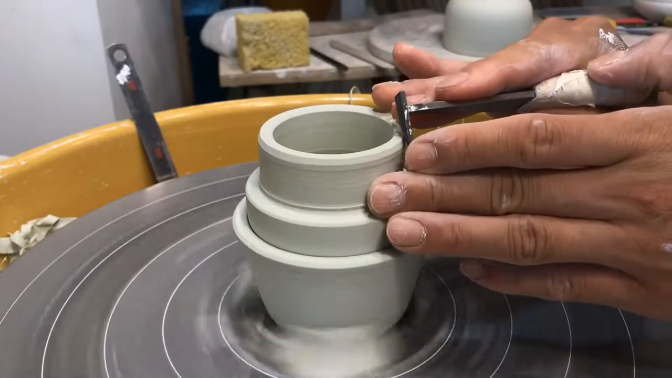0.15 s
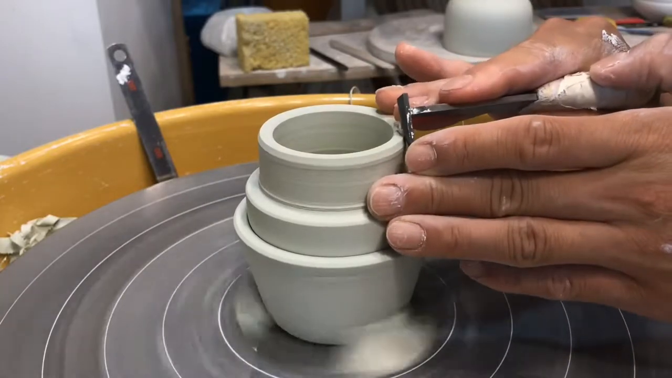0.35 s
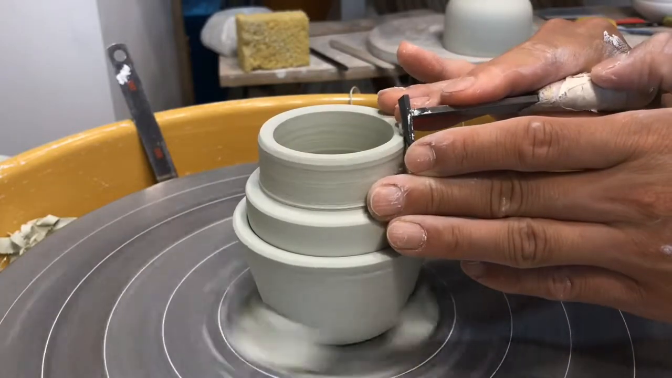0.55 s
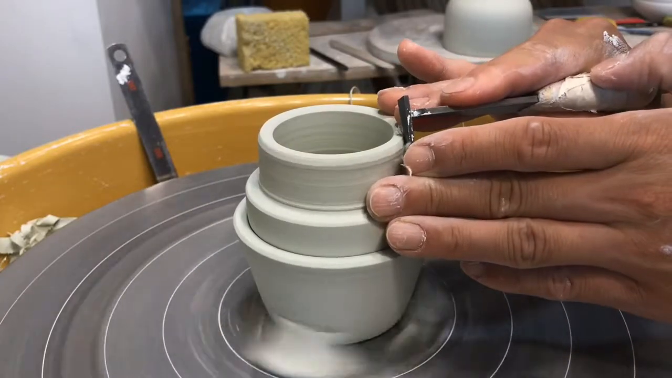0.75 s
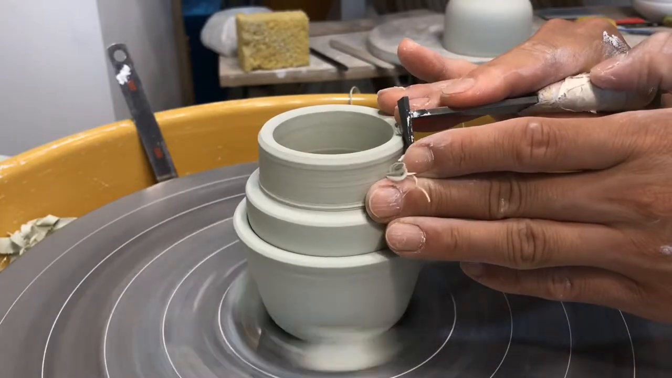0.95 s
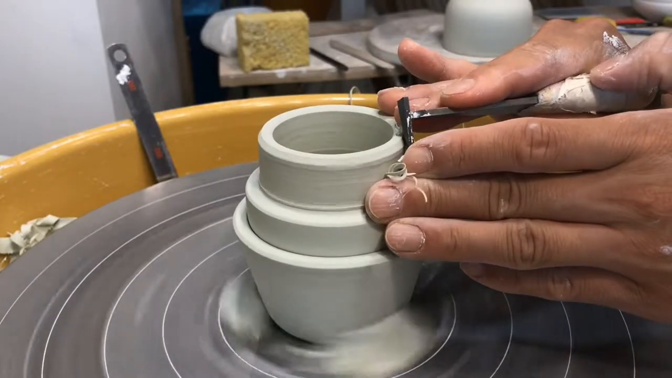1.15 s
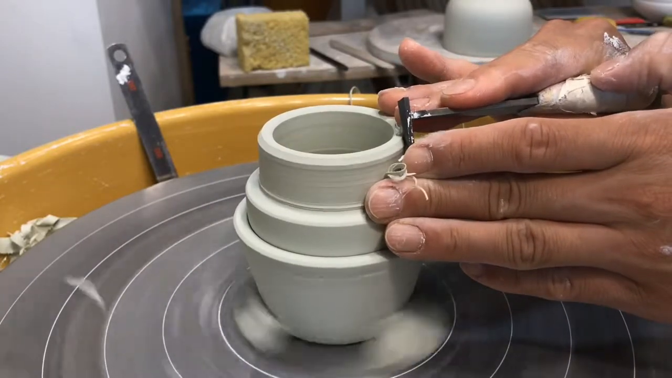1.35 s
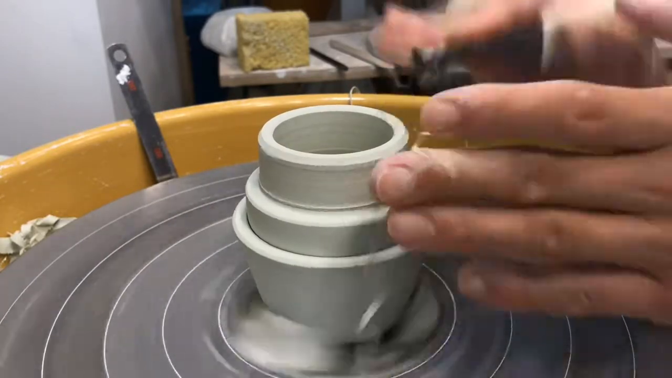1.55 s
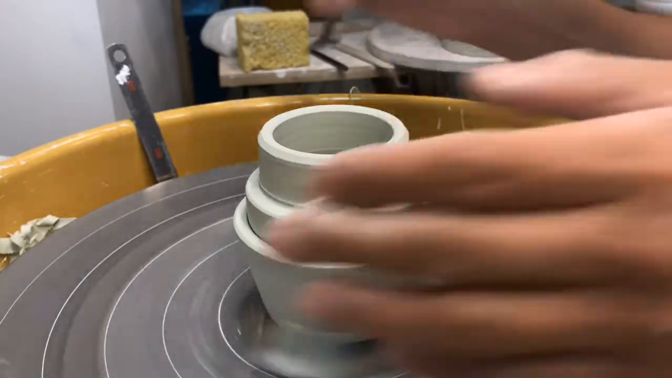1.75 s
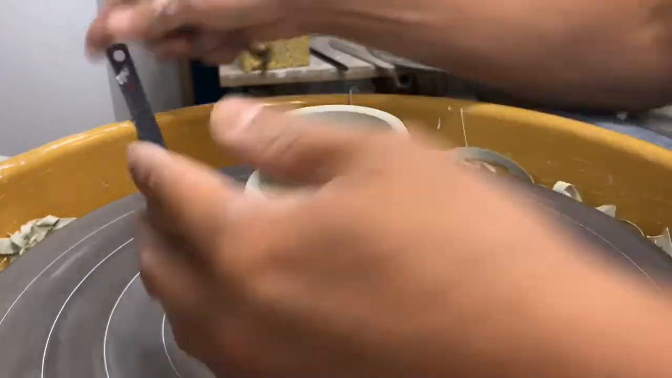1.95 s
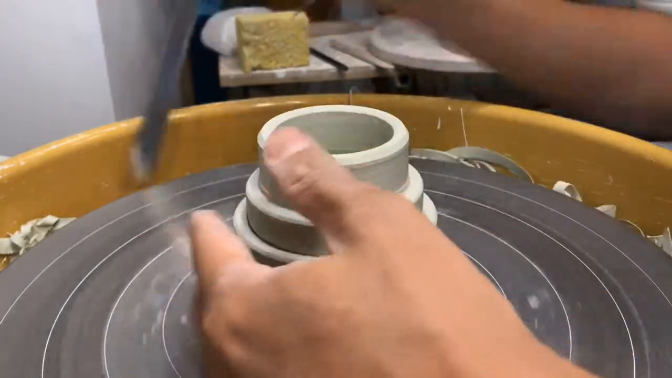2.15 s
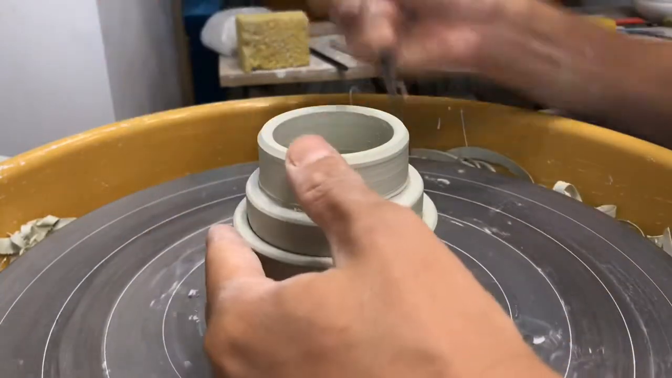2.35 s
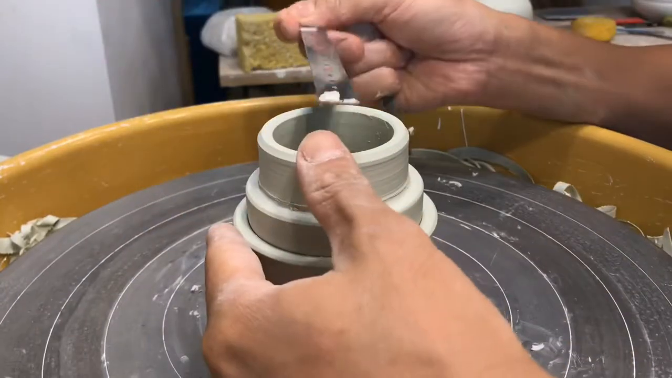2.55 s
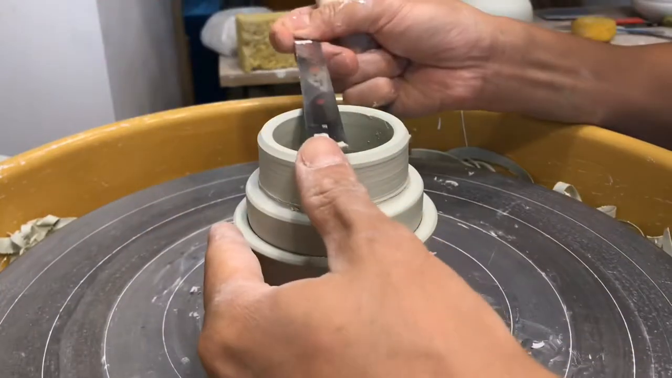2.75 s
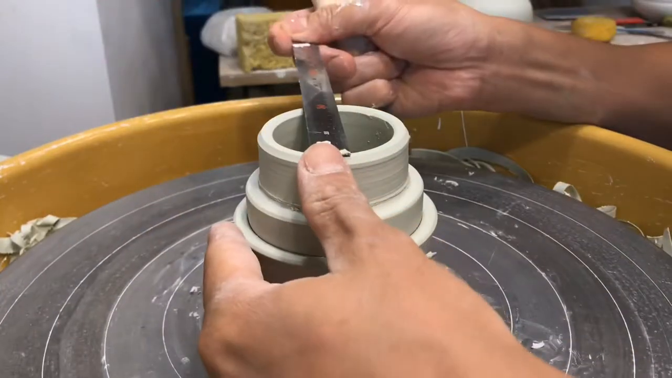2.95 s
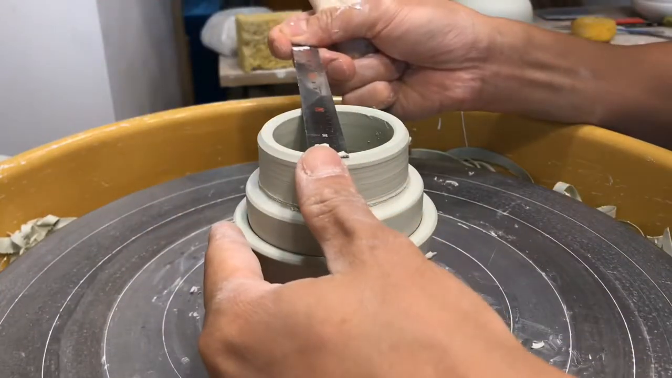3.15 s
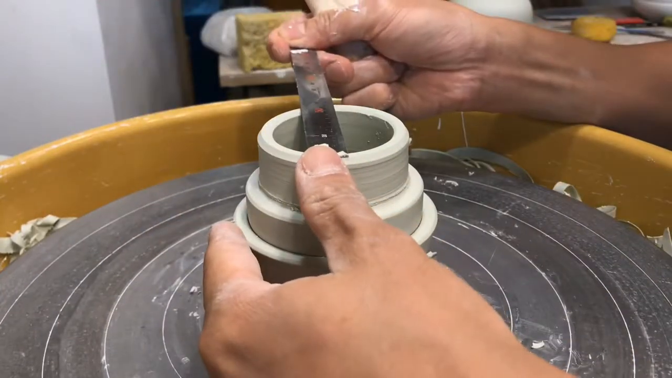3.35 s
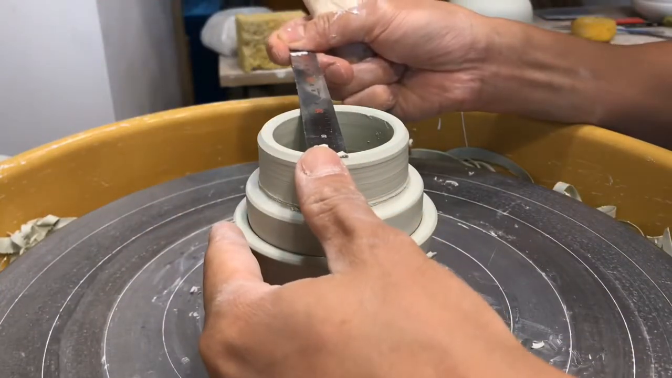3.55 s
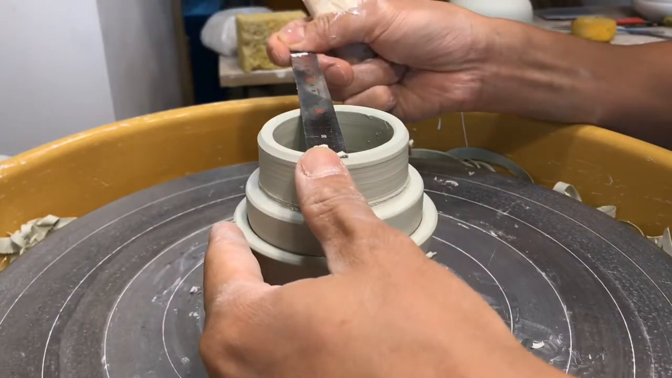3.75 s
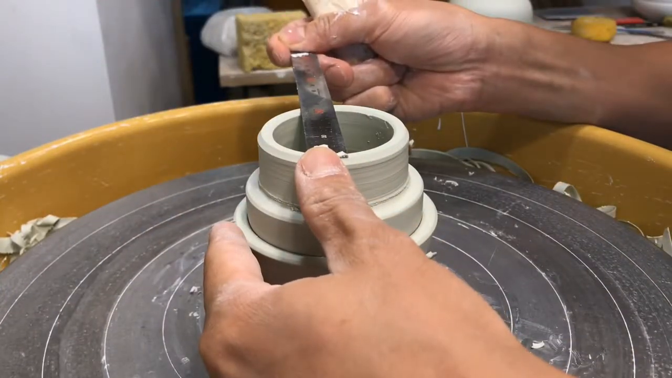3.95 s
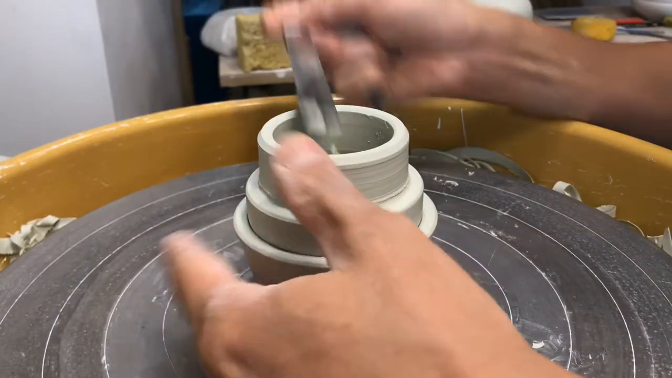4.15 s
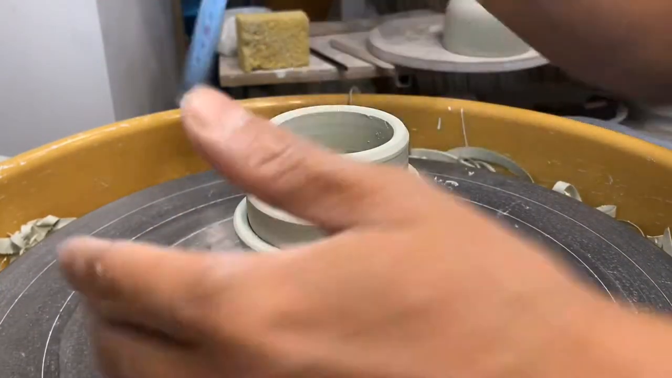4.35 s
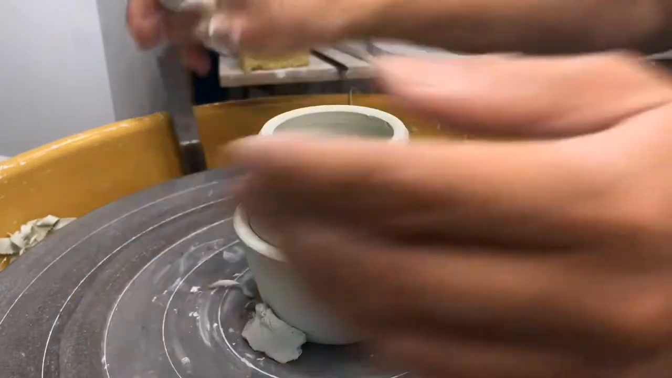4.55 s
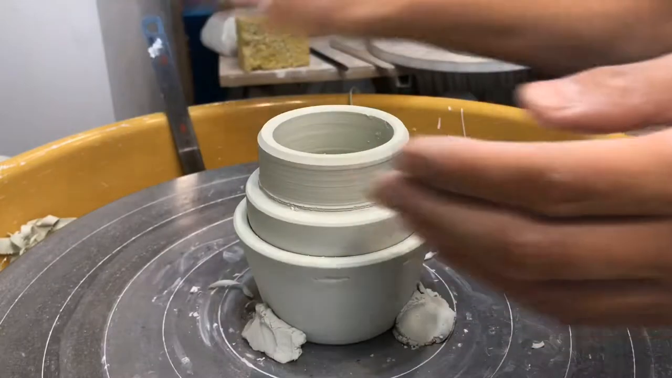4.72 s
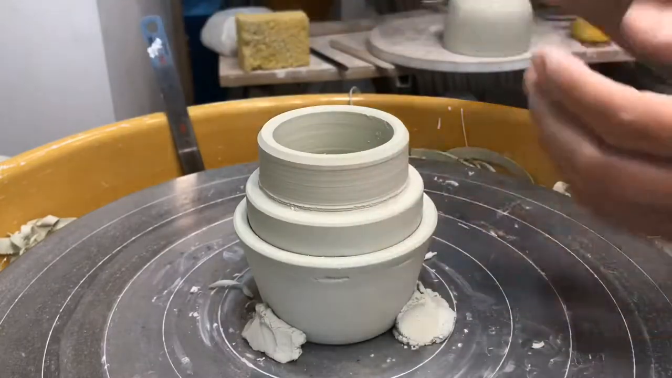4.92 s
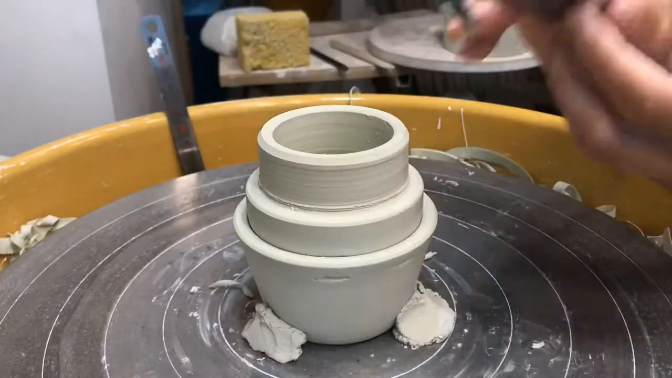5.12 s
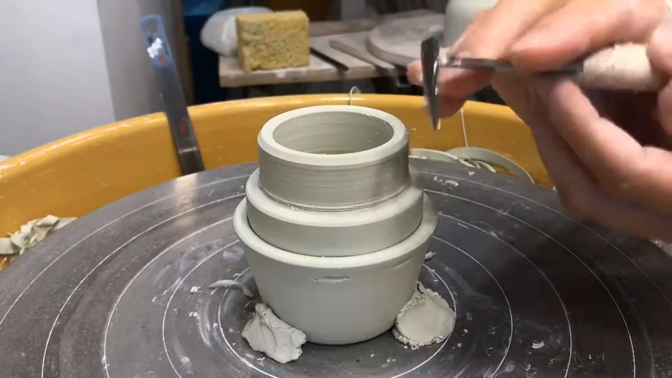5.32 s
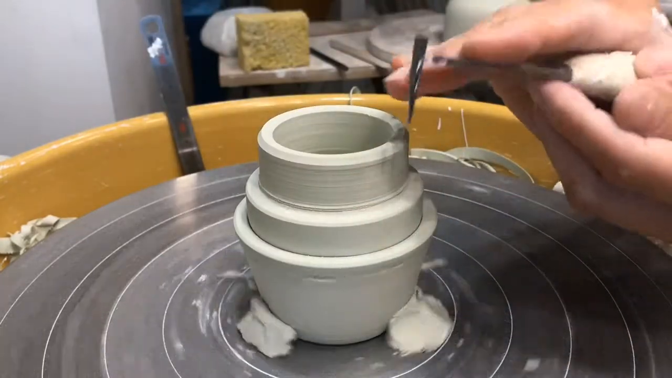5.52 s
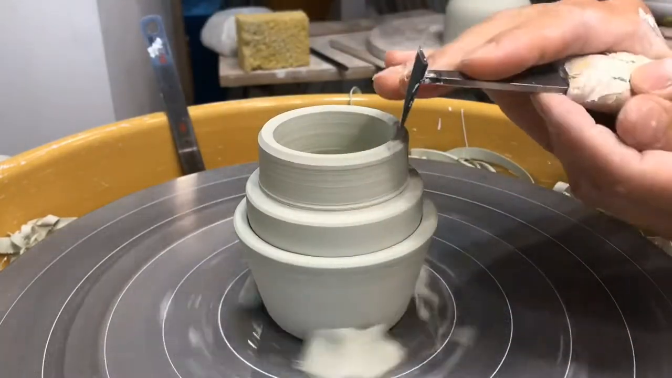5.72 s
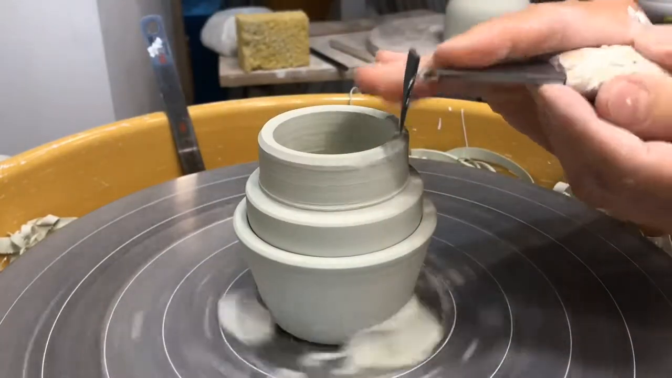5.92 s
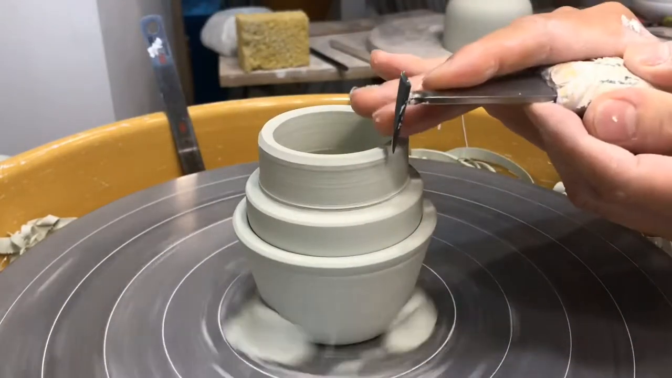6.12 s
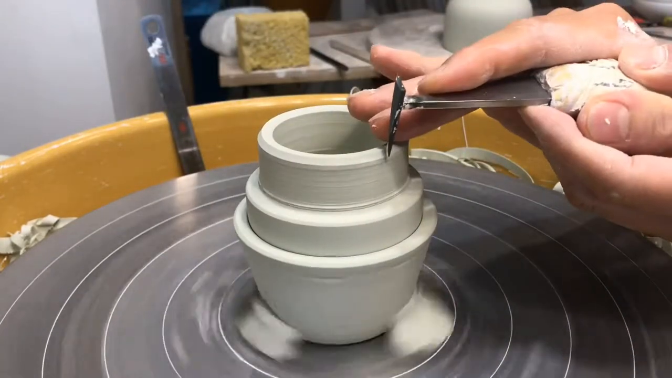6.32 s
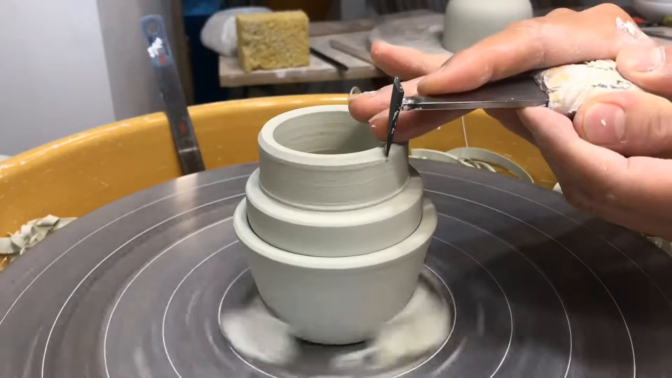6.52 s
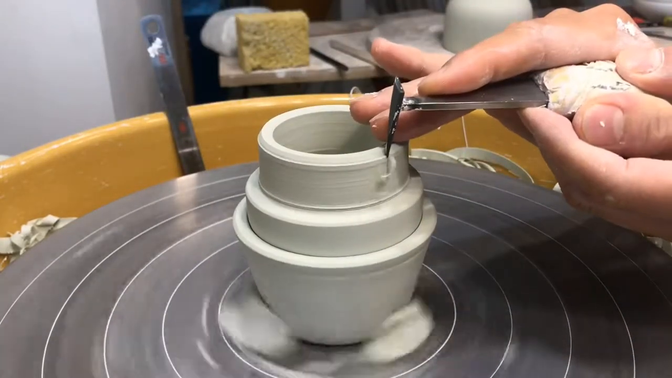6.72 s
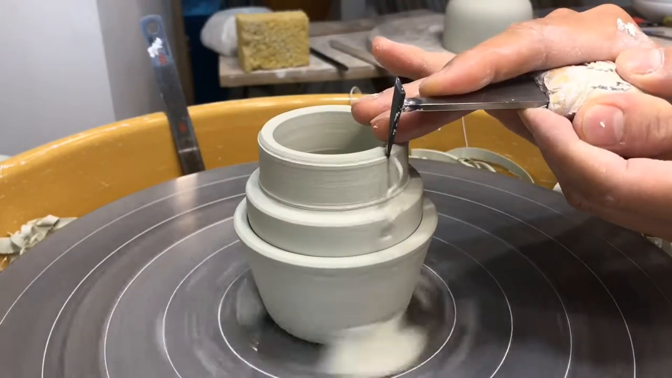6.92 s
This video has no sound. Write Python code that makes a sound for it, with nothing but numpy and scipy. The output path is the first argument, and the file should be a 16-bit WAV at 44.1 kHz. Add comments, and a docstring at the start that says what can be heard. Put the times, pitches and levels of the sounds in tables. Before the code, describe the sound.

Motor rumble, clay hiss and thin high whine fade out; a steel blade squeaks and clatters, small clicks and touches follow, and the wheel restarts softer.

```python
"""Trimming clay on a potter's wheel

An electric wheel hums, hisses and whines in a small studio while a loop tool trims the clay.
As it coasts to rest a steel blade squeaks and knocks on the splash pan, and a control rattles and clicks.
Hands and sleeves shift about the pot, then the wheel starts again and the trimming goes on.
Shaped noise makes the rubbing and rumbling, steady waves the whine, and fading waves the ringing of
struck things."""
import sys
import numpy as np
from scipy import signal
from scipy.fft import rfft, irfft
from scipy.io import wavfile
from scipy.ndimage import uniform_filter1d, map_coordinates

SR = 44100
rng = np.random.default_rng(int(sys.argv[2]) if len(sys.argv) > 2 else 0)


def wrap_up_sound(samples):
    """Save the sound to the file named by the first command line argument, as 16-bit audio."""
    columns = np.atleast_2d(samples).T
    # keep every value between -1 and 1, then stretch to whole-number steps
    tamed = np.clip(columns, -1, 1)
    steps = np.round(tamed * 32767).astype(np.int16)
    wavfile.write(sys.argv[1], SR, steps)


N = 307850
T = np.arange(N) / SR  # time of every sample [s]
HZ = np.maximum(np.arange(N // 2 + 1) * SR / N, 1)  # frequencies of the spectrum [Hz]

# Tone balance of the studio air: (frequency [Hz], relative level [dB])
AIR_COLOUR = [(15, -39), (25, -18), (48, -8.5), (64, -8), (78, -7), (87, -17), (134, -18.5), (249, -21.5),
              (285, -24), (427, -25.5), (1700, -33.5), (4870, -40), (7110, -40.5), (7710, -42.5),
              (16000, -41.5)]
# Tone balance of the echo from the walls: (frequency [Hz], relative level [dB])
WALL_COLOUR = [(80, -1), (300, -1), (900, -1.5), (2500, -0.5), (7000, -5.5), (15000, -4.5)]

# Tone balance of rustling sleeves: (frequency [Hz], relative level [dB])
CLOTH_COLOUR = [(59, -26), (100, -7), (124, -7), (156, -22), (229, -6.5), (322, -24.5), (481, -18.5),
                (676, -18), (950, -17.5), (1030, -23), (1520, -20), (12100, -25), (16000, -27.5)]
# Tone balance of brushing palms: (frequency [Hz], relative level [dB])
PALM_COLOUR = [(500, -27), (2500, -3.0), (7500, 4.5), (11000, 2), (16000, 0.5)]
# Tone balance of scraping steel: (frequency [Hz], relative level [dB])
SCRAPE_COLOUR = [(200, -6.5), (700, -4.5), (2000, 0.5), (6000, 2.0), (10000, -1.5), (16000, -0.5)]
# Arm movements that rustle the sleeves: (middle [s], width [s], level [dB])
ARM_MOVES = [(4.31, 0.049, -56.5), (4.51, 0.056, -60.5), (4.67, 0.052, -49.5), (4.84, 0.15, -56.5),
             (5.34, 0.089, -62), (5.65, 0.068, -55.5)]
# Palms brushing past each other: (middle [s], width [s], level before colouring [dB])
SWISHES = [(4.925, 0.0098, -52), (5.167, 0.02, -54), (5.33, .02, -63)]
# Fingers rubbing over the pot: (middle [s], width [s], level [dB])
RUBS = [(2.163, .016, -41), (2.25, 0.061, -49.5), (4.5, 0.042, -55), (4.76, 0.054, -59.5),
        (4.89, .04, -58.5), (5.57, .03, -61.5), (5.66, 0.016, -48.5)]
# Short scrapes of steel: (start [s], length [s], level before roughening and colouring [dB])
SCRAPES = [(1.82, .14, -50.5), (1.96, .08, -48.5), (2.135, 0.1, -42.5), (5.673, 0.034, -39)]

# Fingers and tools touching pot and wheel head:
# (time [s], tick before colouring [dB], hollow ring [dB], thud [dB])
TOUCHES = [(2.159, -47, -40, -58), (2.518, -50, -50, -52), (2.659, -68, -51, -53.5),
           (4.251, -70, -46.5, -50), (4.259, -52, -48, -52), (4.452, -66, -52, -50),
           (4.464, -65, -51, -46.5), (4.510, -71, -49.5, -46.5), (4.541, -50.5, -52, -63),
           (4.586, -53.5, -54, -73), (4.645, -59, -54, -46), (4.662, -52, -51, -46.5),
           (4.734, -57.5, -58, -74), (4.841, -50, -54, -72), (4.953, -54, -55, -74), (4.985, -68, -56, -70),
           (5.074, -53, -49.5, -57), (5.358, -76, -42.5, -51), (5.68, -46.5, -66, -75),
           (5.693, -54, -49, -50), (5.9, -63, -50, -46), (5.986, -52, -44, -54), (6.135, -74, -54, -42.5)]
# Tone balance of the ticks: (frequency [Hz], relative level [dB])
TICK_COLOUR = [(300, -3.5), (1000, 5), (2000, 0.5), (4000, -1.0), (8000, -8.0), (16000, -13)]
# Ringing of the pot on the wheel head: (frequency [Hz], relative level [dB], time to fade by 60 dB [s])
POT_RING = [(290, -8, 0.083), (424, -11.5, 0.059), (550, -3, 0.036), (635, 4, 0.043), (724, -7, 0.044),
            (1120, -13.5, 0.035)]
# Ringing of the wheel on its stand: (frequency [Hz], relative level [dB], time to fade by 60 dB [s])
STAND_RING = [(85, -4.5, 0.17), (127, -5.5, 0.19), (188, -1, 0.089), (233, -0.5, 0.053)]

# Clicks and rattle of the control:
# (time [s], snap before colouring [dB], casing [dB], top of the snap [Hz])
CLICKS = [(2.3305, -34.5, -41, 12200), (2.3385, -35, -42, 15000), (2.3451, -33.5, -42, 14900),
          (2.3562, -30.5, -42, 15000), (2.3645, -33, -42.5, 15000), (2.3708, -34.5, -47, 15000),
          (2.378, -32, -47, 15000), (2.3846, -36, -45, 12000), (2.4061, -33.5, -37, 15000),
          (2.4502, -57, -51, 6950), (2.492, -32, -35.5, 16000), (2.512, -37.5, -38, 4500),
          (2.6128, -45.5, -45.5, 4070), (2.9579, -37, -43.5, 15000), (3.6577, -50.5, -47.5, 5900),
          (4.1834, -36.5, -40, 13900), (4.233, -45.5, -45, 5500)]
# Tone balance of the snaps: (frequency [Hz], relative level [dB])
SNAP_COLOUR = [(200, -10), (500, -0.5), (1200, 3.5), (2300, -1), (4500, 0), (7000, -0.5), (9000, -1.5),
               (14000, -1), (16000, 3)]
# Ringing of the control's casing: (frequency [Hz], relative level [dB], time to fade by 60 dB [s])
CASING_RING = [(431, -1, 0.046), (546, 3.5, 0.043), (653, -3, 0.13), (793, 12.5, 0.02), (923, -5, 0.092),
               (1079, -6.5, 0.1), (1314, -9.5, 0.056)]

# Blade striking the pan: (time [s], level before it is shared between crack and ring [dB])
KNOCKS = [(2.2029, -22.5), (2.2074, -27), (2.215, -24.5), (2.23, -34.5), (2.245, -34.5)]
# Tone balance of the crack of each knock: (frequency [Hz], relative level [dB])
KNOCK_COLOUR = [(100, -24.5), (250, -6), (700, -3), (1500, -2), (2100, -6), (3000, 2), (3800, -4),
                (4400, -0.5), (5300, -6.5), (8500, -12.5), (12000, -20), (16000, -25.5)]
# Ringing of blade and pan: (frequency [Hz], relative level [dB], time to fade by 60 dB [s])
BLADE_RING = [(245, -10, .2), (780, -12, .15), (1168, -11, .15), (1335, -10, .2), (1439, -7, .22),
              (1540, 1, .19), (1640, -8, .12), (1900, -9, .1), (2190, -10, .1), (2536, -2, .14),
              (2798, -5, .13), (2860, -3, .13), (2962, -2, .15), (3000, -5, .15), (3320, -4, .11),
              (3490, -5, .1), (4230, -7, .1), (4442, -4, .13), (4612, -7, .14), (5930, -9, .14),
              (6230, -14, .16), (7280, -10, .14), (8520, -12, .1)]
# Ringing of the blade swinging free, before damping:
# (frequency [Hz], relative level [dB], time to fade by 60 dB [s])
FREE_BLADE_RING = [(1044, -5, .7), (2132, 0, .75), (3375, -14, .7), (3725, -9, .8)]

# The wheel runs, coasts to rest and is started again: (time [s], speed [share of full speed])
SPEED = [(0, 0.98), (1.8, 1), (2.0, 0.79), (2.12, 0.56), (2.3, 0.3), (2.5, 0.035), (2.68, 0.0022),
         (5.52, 0.008), (5.62, 0.085), (5.76, 0.3), (5.92, 0.44), (6.35, 0.53), (6.98, 0.63)]
# For each run, a moment when the high side of the pot passes the tool: (time [s])
HIGH_SPOT_S = [0.99, 6.28]

# The controller feeds the motor: (on [s], off [s])
FEEDS = [(0, 2.115), (6.26, 6.98)]
# Switching tone at full load, split by mains ripple: (frequency [Hz], relative level [dB])
FULL_LOAD_LINES = [(14185, -70.5), (14734, -67), (14917, -56.5), (15041, -60), (15100, -57.5), (15165, -69),
                   (15283, -72.5), (15348, -69.5)]
# Switching tone under light load: (frequency [Hz], relative level [dB])
LIGHT_LOAD_LINES = [(14729, -72), (14831, -70), (14955, -67), (15030, -67), (15068, -50)]
# Noisy band around the switching tone: (frequency [Hz], width [Hz], relative level [dB])
WHINE_BAND = [(15060, 300, 0)]

# Drumming resonance of the drive: (frequency [Hz], width [Hz], relative level [dB])
DRUM = [(195.6, 14.4, 0)]
# Resonances of the frame and pan: (frequency [Hz], width [Hz], relative level [dB])
FRAME = [(100, 14, -14.5), (220.5, 17, -6), (355, 15, -20), (422, 16, -18), (537, 28.6, -10), (611, 12, -9),
         (700, 18, -12.5), (822, 28, 0.5), (848, 36, 3.5), (937.4, 40, 1), (990, 30, -10), (1047, 45, -8),
         (1298, 77, -8), (1633, 20, -11), (1845, 28, -12), (2848, 27, -10.5)]
# Resonances of the motor shell: (frequency [Hz], width [Hz], relative level [dB])
SHELL = [(2339, 50, -3.5), (2432, 40, 0), (2800, 60, -0.5), (3040, 52, -5.5), (3134, 70, 1.5),
         (3587, 64, 2.5), (3700, 55, -1.5), (3970, 160, -5), (4200, 35, 2.5), (4300, 30, -4), (4530, 70, 0),
         (4743, 59, 6), (5574, 60, -4.5), (5770, 50, -6.5), (6000, 90, 5.5), (6530, 55, -8), (7157, 68, -1),
         (7400, 110, -10), (8060, 39, -10)]
# Tones of the drive, strongest at full speed: (frequency [Hz], relative level [dB])
DRIVE_TONES = [(453, -16), (538, -22), (851, -13), (932, -14), (1038.5, -22), (1271, -17), (1549.5, -31)]
# Tone balance of the bearings: (frequency [Hz], relative level [dB])
BEARING_COLOUR = [(30, -41), (60, -10.5), (125, -9.5), (160, -19.5), (240, -3), (300, -5), (360, 2.5),
                  (490, -2), (620, 5.5), (900, -4), (1130, -12), (1500, -23.5), (2200, -21), (9000, -38)]

# Loop tool held against the clay: (on [s], off [s], extra hiss [dB], ringing of the pot [dB])
CUTS = [(0, 1.424, 0.14, -55.5), (6.248, 6.98, -1, -56)]
# Tone balance of the turning wheel and clay: (frequency [Hz], relative level [dB])
CLAY_COLOUR = [(400, -23.5), (1500, 3.5), (4000, 2), (5200, -2.5), (7800, -3), (9600, 0.5), (10400, -4),
               (13000, 0), (14200, 2.5), (15500, 2), (16200, -32.5)]
# Resonances of the pot when it is rubbed: (frequency [Hz], width [Hz], relative level [dB])
RUBBED_POT = [(125, 54, -6.5), (288, 120, -6.5), (440, 90, -7), (557, 73, -1.0),
              (618, 70, 6.0), (750, 110, -7.5), (1030, 250, -7.5)]

# A hard snap dies fast; duller ones last longer by this power of the ratio of their tops
SNAP_DECAY_S, SNAP_HARD_HZ, SNAP_SOFTENING = 0.0046, 15000, 0.48
# The blade's squeak on the rim starts low by the bend, then rises
SQUEAK_S, SQUEAK_WIDTH_S, SQUEAK_DB = 2.169, 0.0081, -30.5
SQUEAK_START_S, SQUEAK_HZ, SQUEAK_BEND_HZ, SQUEAK_BEND_S = 2.142, 4790, 520, .025
TURN_HZ = 2.95  # turns a second at full speed
STOP_S, START_S = 2.68, 5.52  # the wheel stands still between these times
FEED_RISE_S, FEED_FALL_S = .015, .015
WHINE_FULL_DB, WHINE_LIGHT_DB = -51, -56
# Share of full speed at which the whine changes over, and how gradually
FULL_LOAD_FROM, FULL_LOAD_BLEND = 0.9, .05
# Level of each part at full speed [dB], and the power of speed that its strength follows
DRUM_DB, DRUM_POWER = -44.5, 1.03  # level before the low cut
RUMBLE_DB, RUMBLE_POWER = -45.5, 1.2
FRAME_DB, FRAME_POWER = -37.5, 2.36
TONES_DB, TONES_POWER = -36, 2.9  # added to the relative level of each tone
HISS_DB, HISS_POWER = -48.5, 1.11
# Brush noise levels off [dB]; it is at half that strength at the knee [share of full speed]
BRUSH_DB, BRUSH_KNEE = -50.5, 0.12
SHELL_WAVER = 0.00499  # typical share by which the brush noise wavers in pitch
CUT_RISE_S, CUT_FALL_S = 0.061, .06


def undb(db):
    """Turn decibels into a gain."""
    return 10 ** (np.asarray(db) / 20)


def unit(x):
    """Scale to an average strength (rms) of 1."""
    return x / np.sqrt(np.mean(x ** 2))


def noise():
    """White noise of full length."""
    return rng.standard_normal(N)


def walk(rate):
    """Smooth random drift with rms 1, taking about `rate` new values a second."""
    k = int(SR / rate)
    steps = np.repeat(rng.standard_normal(N // k + 1), k)
    return unit(uniform_filter1d(uniform_filter1d(steps, k), k)[:N])


def colour(x, points):
    """Give x the tone balance of the points, without sounding early; the mean power gain is 1."""
    hz, db = np.transpose(points)
    gain = unit(undb(np.interp(np.log(HZ), np.log(hz), db)))
    # Folding the cepstrum makes the filter respond only after its input
    cepstrum = irfft(np.log(gain), N)
    cepstrum[1:N // 2] *= 2
    cepstrum[N // 2 + 1:] = 0
    return irfft(rfft(x) * np.exp(rfft(cepstrum)), N)


def resonate(x, modes):
    """Shake steep-sided resonances with x; rms 1. Each is about 4 dB down at the edges of its width."""
    power = 0
    for hz, width, db in modes:
        offset = 0.76 * (HZ - hz) / width * 2
        power = power + undb(2 * db) / (1 + offset ** 2) ** 2
    return unit(irfft(rfft(x) * np.sqrt(power), N))


def set_energy(x, db):
    """Scale a short sound so that its energy equals 10 ms at the level db."""
    return x * undb(db) * np.sqrt(SR / 100 / np.sum(x ** 2))


def burst(decay, db, top_hz=16000, spike=0.69):
    """Crack of a contact: a first spike, then grainy dying noise; softer contacts have a lower top."""
    t = T[:SR // 4]
    hiss, grain = rng.standard_normal((2, len(t)))
    fade = np.exp(-t / decay) + spike * np.exp(-t / 0.00033)
    onset = 1 - np.exp(-t / 0.00025)
    crack = hiss * undb(2.3 * grain) * fade * onset
    low_pass = signal.butter(2, min(top_hz, .45 * SR), fs=SR, output="sos")
    return set_energy(signal.sosfilt(low_pass, crack), db)


def ring(modes, db, scatter=.03):
    """Fading tones of a struck thing; each contact shifts and weights them a little differently."""
    t = T[:SR // 2]
    hz, mode_db, t60 = np.transpose(modes)[:, :, None]
    shift, weight, turn = rng.standard_normal((3, len(modes), 1))
    waves = np.sin(2 * np.pi * (hz * (1 + scatter * shift) * t + turn))
    waves = waves * np.exp(-np.log(1000) * t / t60)
    mixed = (undb(mode_db + 2 * weight) * waves).sum(axis=0)
    return set_energy(mixed * (1 - np.exp(-t / 0.0014)), db)


def add(track, s, x):
    """Mix x into the track from time s."""
    i = int(s * SR)
    track[i:i + len(x)] += x[:N - i]


def swells(rows):
    """Gain of movements that swell and die away evenly; their powers add."""
    power = 0
    for s, width, db in rows:
        distance = np.minimum(np.abs(T - s) / width, 60)
        power = power + (undb(db) / np.cosh(distance)) ** 2
    return np.sqrt(power)


def strokes(rows):
    """Brief slides: friction noise that swells and fades."""
    track = np.zeros(N)
    for s, length, db in rows:
        count = int(length * SR)
        shape = signal.windows.tukey(count, .8)
        add(track, s, undb(db) * shape * rng.standard_normal(count))
    return track


def held(on, off, rise, fall):
    """Gain 1 from on to off, with an exponential rise before and fall after."""
    return np.exp(-np.maximum(on - T, 0) / rise - np.maximum(T - off, 0) / fall)


def wheel_speed():
    """Share of full speed at every moment."""
    turning = (T < STOP_S) | (T > START_S)
    return np.maximum(np.interp(T, *np.transpose(SPEED)), 0) * turning


def wobble(lag=0):
    """The pot is a little off centre: +1 as its high side passes, `lag` turns later."""
    turns = np.cumsum(wheel_speed()) * TURN_HZ / SR
    first, second = np.interp(HIGH_SPOT_S, T, turns)
    return np.cos(2 * np.pi * (turns - lag - np.where(T < START_S, first, second)))


def rubbed_pot():
    """Uneven friction heard through the resonances of the pot; rms 1."""
    slips = noise() * undb(2.5 * walk(90))
    return resonate(slips, RUBBED_POT)


def studio_air():
    """The low murmur of the studio's air is shaped noise that drifts slowly in level."""
    return unit(colour(noise(), AIR_COLOUR)) * undb(-65 + .8 * walk(5))


def mains_hum():
    """A faint 60 Hz hum whose level drifts."""
    return undb(-70.0 + 2 * walk(4.5)) * np.sin(2 * np.pi * 60 * T)


def room(x, t60_low=0.35, t60_high=0.28, wet_db=-13):
    """Shelves and walls return a short blurred echo whose treble dies first."""
    t = T[:SR]
    low_pass = signal.butter(2, 2500, fs=SR, output="sos")
    high_pass = signal.butter(2, 2500, "high", fs=SR, output="sos")
    low = signal.sosfilt(low_pass, rng.standard_normal(len(t)))
    high = signal.sosfilt(high_pass, rng.standard_normal(len(t)))
    tail = low * undb(-60 * t / t60_low) + high * undb(-60 * t / t60_high)
    tail = tail * (1 - np.exp(-t / 0.003))
    echo = signal.fftconvolve(x, tail / np.linalg.norm(tail))[:N]
    return undb(wet_db) * colour(echo, WALL_COLOUR)


def hands():
    """Sleeves rustle, palms swish, fingers rub the pot in fits and starts, and steel scrapes on it."""
    sleeves = unit(colour(noise() * undb(1.5 * walk(150)), CLOTH_COLOUR)) * swells(ARM_MOVES)
    palms = colour(noise() * undb(1.5 * walk(200)) * swells(SWISHES), PALM_COLOUR)
    rub = rubbed_pot() * swells(RUBS)
    grit = colour(strokes(SCRAPES) * undb(3.4 * walk(500)), SCRAPE_COLOUR)
    return sleeves + palms + rub + grit


def touches():
    """Soft contacts tick, ring the hollow pot and thud in the stand."""
    ticks, body = np.zeros((2, N))
    for s, tick_db, ring_db, thud_db in TOUCHES:
        add(ticks, s, burst(.0035, tick_db))
        add(body, s, ring(POT_RING, ring_db, scatter=.07))
        add(body, s, ring(STAND_RING, thud_db, scatter=0.073))
    return colour(ticks, TICK_COLOUR) + body


def control():
    """A catch snaps over its notches and rings the hollow casing."""
    snaps, casing = np.zeros((2, N))
    for s, snap_db, casing_db, top_hz in CLICKS:
        decay = SNAP_DECAY_S * (SNAP_HARD_HZ / top_hz) ** SNAP_SOFTENING
        add(snaps, s, burst(decay, snap_db, top_hz))
        add(casing, s, ring(CASING_RING, casing_db, scatter=0.07))
    return colour(snaps, SNAP_COLOUR) + casing


def blade(free_s=2.45, free_db=-45):
    """The blade squeaks as it slides, strikes the pan, chatters, and rings faintly until the pot damps it."""
    crack, rings = np.zeros((2, N))
    for s, db in KNOCKS:
        add(crack, s, burst(.008, db - 3.5))
        add(rings, s, ring(BLADE_RING, db - 5.5, scatter=0.0012))
    damping = np.exp(-np.maximum(T[:SR // 2] - .17, 0) / .02)
    add(rings, free_s, ring(FREE_BLADE_RING, free_db, scatter=0.0005) * damping)
    bend = SQUEAK_BEND_HZ * np.exp(-np.maximum(T - SQUEAK_START_S, 0) / SQUEAK_BEND_S)
    pitch = (SQUEAK_HZ - bend) * (1 + 0.008 * walk(500))
    contact = held(SQUEAK_S, SQUEAK_S + SQUEAK_WIDTH_S, .013, .004)
    squeak = np.sin(2 * np.pi * np.cumsum(pitch) / SR) * undb(SQUEAK_DB) * contact
    return colour(crack, KNOCK_COLOUR) + rings + squeak


def whine(lines):
    """A cluster of steady high tones, each drifting in level; rms 1."""
    total = 0
    for hz, db in lines:
        tone = np.sin(2 * np.pi * (hz * T + rng.random()))
        total = total + undb(db + 1.5 * walk(25)) * tone
    return unit(total)


def controller():
    """The chopped motor current sings just under the top of hearing; its lines shift with the load."""
    jitter = undb(-4.5) * resonate(noise(), WHINE_BAND)
    full = undb(WHINE_FULL_DB) * (whine(FULL_LOAD_LINES) + jitter)
    light = undb(WHINE_LIGHT_DB) * (whine(LIGHT_LOAD_LINES) + jitter)
    # Speed stands in for load: 0 is light, 1 is full
    load = (1 + np.tanh((wheel_speed() - FULL_LOAD_FROM) / FULL_LOAD_BLEND)) / 2
    feed = sum(held(on, off, FEED_RISE_S, FEED_FALL_S) for on, off in FEEDS)
    return feed * (load * full + (1 - load) * light)


def belt_drum():
    """The belt drums on one low resonance, swelling once a turn."""
    drum = resonate(noise(), DRUM)
    # The steady belt keeps the drum from fading far
    drum = unit(drum / np.abs(signal.hilbert(drum)) ** 0.29)
    drum = drum * undb(DRUM_DB + 2.5 * wobble(lag=.1)) * wheel_speed() ** DRUM_POWER
    # The stand gives off little sound below its resonance
    return signal.sosfilt(signal.butter(8, 179, "high", fs=SR, output="sos"), drum)


def drive_tones():
    """Tones that waver slightly in pitch and level, and only stand out at full speed."""
    sway = np.cumsum(walk(14)) / SR
    tones = 0
    for hz, db in DRIVE_TONES:
        tones = tones + undb(db + 3.5 * walk(15)) * np.sin(2 * np.pi * hz * (T + .003 * sway))
    return tones * undb(TONES_DB) * wheel_speed() ** TONES_POWER


def brushes():
    """The wandering brush contact lets neighbouring shell resonances rise and fall on their own."""
    shell = 0
    for k in range(3):
        band = resonate(noise() * undb(2 * walk(400)), SHELL[k::3])
        shell = shell + band * undb(2.2 * walk(24))
    # Reading the sound a little early or late makes its pitch waver
    places = np.arange(N) + SHELL_WAVER * np.cumsum(walk(45))
    shell = map_coordinates(unit(shell), [places], mode="mirror")
    speed = wheel_speed()
    strength = undb(BRUSH_DB + 1.8 * wobble() + 1.0 * walk(25))
    return shell * strength * speed / (speed + BRUSH_KNEE)


def motor():
    """Bearings and belt shake the frame more as speed rises; drum and brushes swell once a turn."""
    speed = wheel_speed()
    bearings = colour(noise(), BEARING_COLOUR) * undb(RUMBLE_DB) * speed ** RUMBLE_POWER
    frame = resonate(noise(), FRAME) * undb(FRAME_DB) * speed ** FRAME_POWER
    return belt_drum() + bearings + frame + drive_tones() + brushes()


def trimming(wobble_db=0.8):
    """Wheel and clay hiss with speed, more once a turn; the steel edge changes the hiss and rings the pot."""
    grain = undb(.8 * walk(900) + .5 * walk(20))
    bite_db = wobble_db * wobble()
    pot_gain = 0
    for on, off, hiss_db, ring_db in CUTS:
        contact = held(on, off, CUT_RISE_S, CUT_FALL_S)
        bite_db = bite_db + hiss_db * contact
        pot_gain = pot_gain + undb(ring_db) * contact
    hiss = unit(colour(noise() * grain, CLAY_COLOUR))
    hiss = hiss * undb(HISS_DB + bite_db) * wheel_speed() ** HISS_POWER
    return hiss + pot_gain * rubbed_pot()


def scene():
    """Wheel, trimming and handling over the studio's air and hum; only the handling gets an echo."""
    background = studio_air() + mains_hum()
    handling = hands() + touches() + control() + blade()
    wheel = controller() + motor() + trimming()
    return (background + handling + room(handling) + wheel)[None]


def record(dry):
    """Take away the deepest bass and cut the top of the treble steeply."""
    lean = signal.sosfilt(signal.butter(3, 34, "high", fs=SR, output="sos"), dry)
    return signal.sosfilt(signal.ellip(10, .2, 80, 15700, fs=SR, output="sos"), lean)


dry = scene()
out = record(dry)
wrap_up_sound(out)
```